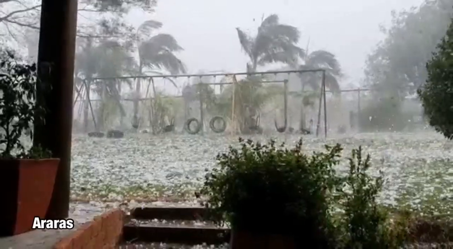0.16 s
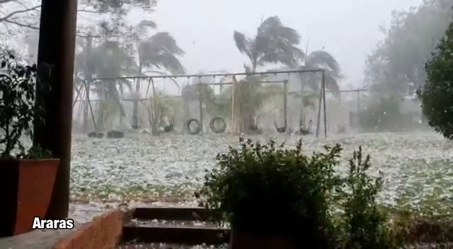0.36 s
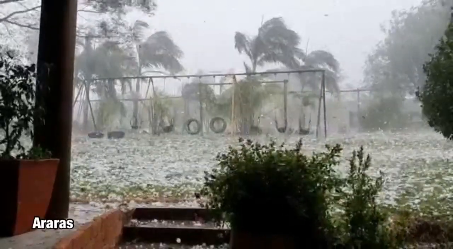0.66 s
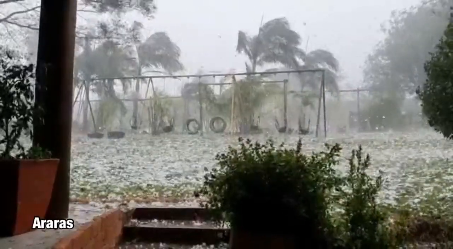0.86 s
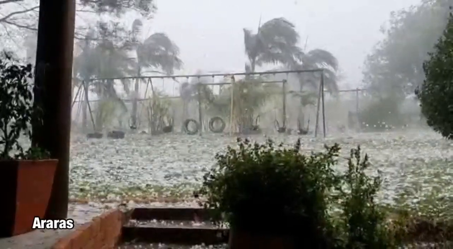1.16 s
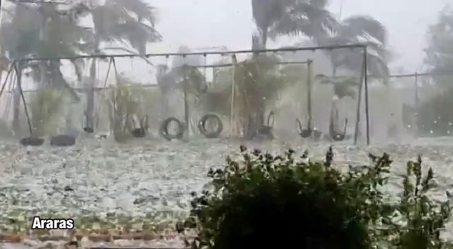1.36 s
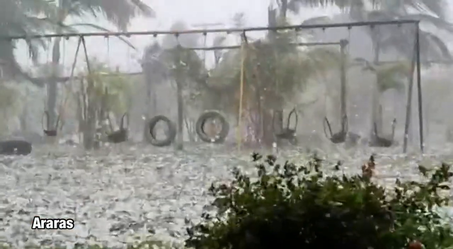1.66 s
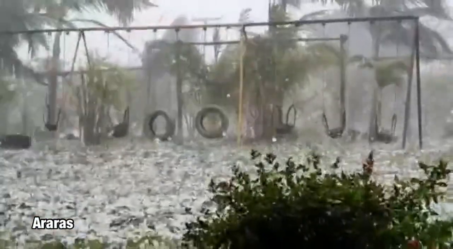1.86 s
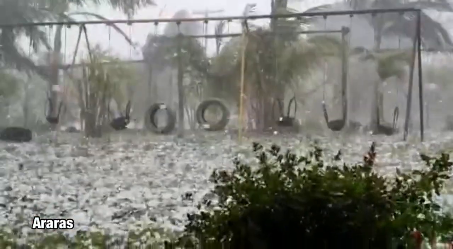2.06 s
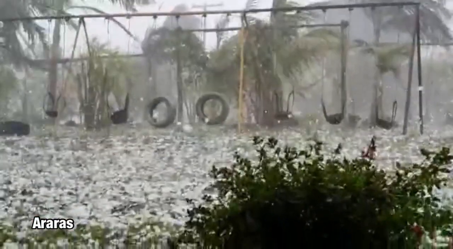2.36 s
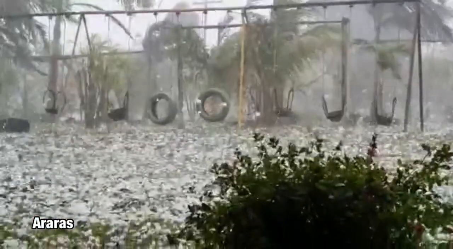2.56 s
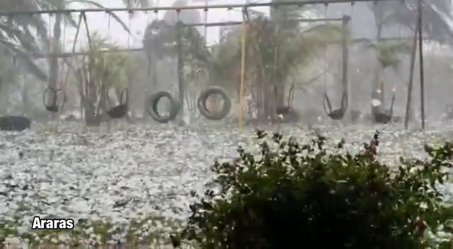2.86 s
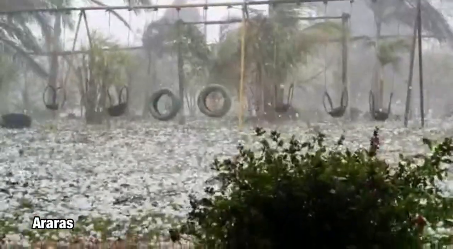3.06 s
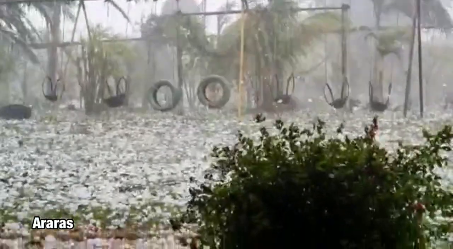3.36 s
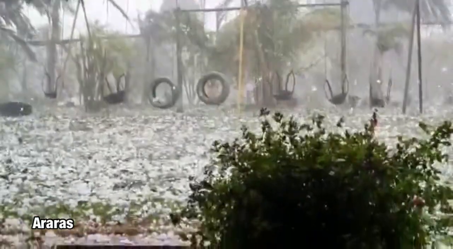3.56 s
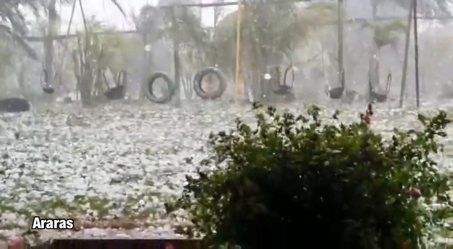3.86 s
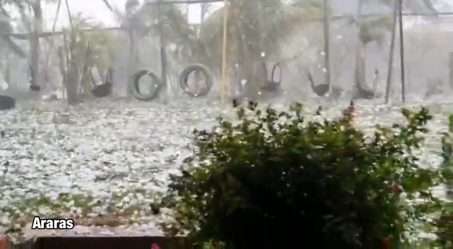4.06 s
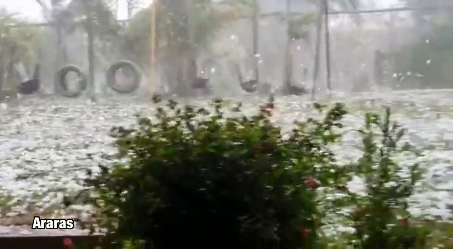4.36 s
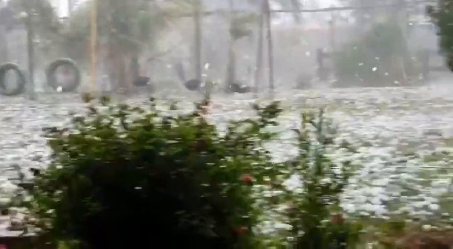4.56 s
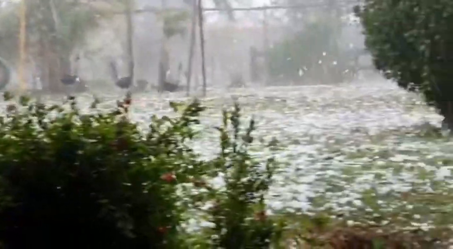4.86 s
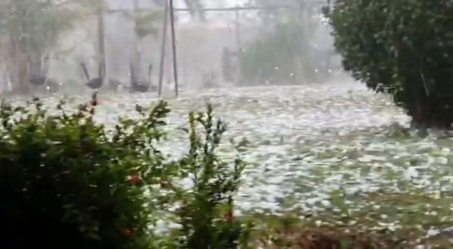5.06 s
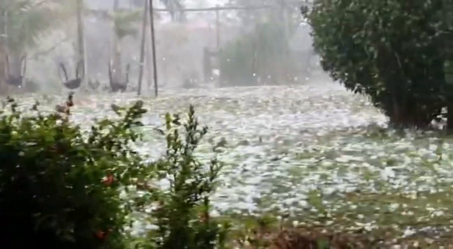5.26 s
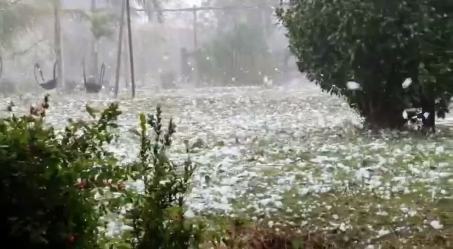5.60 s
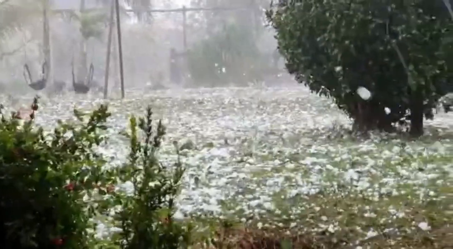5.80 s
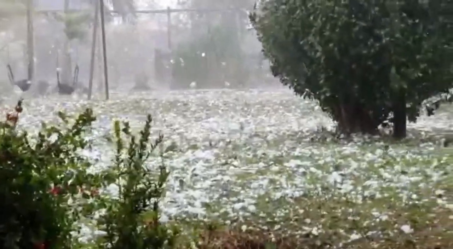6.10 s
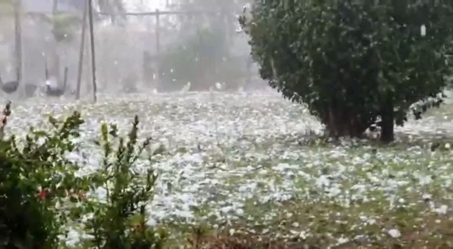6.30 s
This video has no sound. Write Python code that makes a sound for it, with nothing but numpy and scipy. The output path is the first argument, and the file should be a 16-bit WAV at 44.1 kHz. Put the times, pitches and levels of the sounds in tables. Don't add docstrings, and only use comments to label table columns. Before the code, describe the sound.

From a covered porch, a constant dense hailstorm roar with low roof thuds, hard paving knocks, icy ticks and gusty bass booms throughout.

```python
import sys
import numpy as np
from scipy import signal
from scipy.fft import rfft, irfft, dct
from scipy.io import wavfile
from scipy.ndimage import uniform_filter1d

SR = 44100
rng = np.random.default_rng(int(sys.argv[2]) if len(sys.argv) > 2 else 0)


def dump_mix(stems):
    frames = np.atleast_2d(stems).T
    limited = np.clip(frames, -1, 1)
    pcm = np.round(limited * 32767).astype(np.int16)
    wavfile.write(sys.argv[1], SR, pcm)


def undo_db(level):
    steps = np.asarray(level, float) / 20
    return 10 ** steps


N = 283843

# (time [s], fall density [dB], wind drive onto roof [dB])
STORM = [(0.0, -15.5, -23), (0.38, -18, -21), (0.68, -16, -16.5), (1.15, -16.5, -22.5),
         (1.52, -15.5, -18.5), (1.7, -15, -21), (2.26, -15.5, -20), (2.83, -14.5, -18.5),
         (3.05, -15.5, -20), (3.26, -16.5, -22), (3.98, -15, -18.5), (4.21, -15.5, -20), (4.86, -14.5, -18),
         (5.13, -15, -20.5), (5.47, -14, -17), (5.68, -16.5, -20.5), (6.2, -15.5, -21),
         (6.44, -15.5, -17.5)]
# (middle [s], length [s], change [dB])
FLURRIES = [(0.174, 0.039, 1.5), (0.749, .14, 0), (1.135, .08, -1), (1.469, .14, 2), (1.836, 0.087, -2),
            (2.0, 0.08, 0), (2.18, .08, -1.5), (2.944, 0.13, 0), (3.636, .07, -2.5), (3.97, 0.077, -1),
            (4.117, 0.056, -1), (4.227, .08, -1.5), (4.597, .05, -3), (4.858, 0.051, -0.5),
            (5.213, .07, -3), (5.676, .05, -1), (5.793, 0.076, 4), (5.844, 0.035, -2), (6.11, .12, 0.5),
            (6.274, .1, 3.5)]
# (start [s], length [s], level [dB])
BOOM_GUSTS = [(0.453, 0.29, -26.5), (0.797, 0.056, -23.5), (1.264, 0.043, -18.5), (1.401, 0.086, -26.5),
              (1.532, 0.096, -24.5), (1.877, 0.086, -29), (2.17, 0.044, -20), (2.271, 0.116, -27),
              (2.436, 0.158, -24), (2.641, 0.3, -25), (3.06, 0.078, -24.5), (3.327, 0.22, -27.5),
              (3.752, 0.16, -26), (3.973, 0.114, -28.5), (4.197, 0.17, -22.5), (4.525, 0.18, -23),
              (4.929, 0.06, -27), (5.102, 0.35, -24.5), (5.503, 0.095, -19), (5.66, 0.34, -23),
              (6.051, 0.074, -28.5), (6.237, 0.112, -24)]
# (frequency [Hz], density [dB per Hz])
ROAR_COLOUR = [(15, -30.5), (25, -26.5), (71, -5), (96, -2.5), (404, -5), (545, -1), (896, -4), (1940, -5),
               (3030, -10.5), (4080, -14), (4860, -17), (6540, -24.5), (7410, -27.5), (8390, -21.5),
               (9500, -34), (12400, -84), (20900, -120)]
# (centre [Hz], width [Hz], gain [dB])
ROOF_MODE = (96, 11, 5)
# (centre [Hz], width [Hz], gain [dB])
PORT_NOTCH = (7400, 700, -4)
# (time [s], rms of first 7 ms [dB], pitch [Hz])
TICKS = [(0.096, -23, 4760), (0.906, -21, 4470), (1.354, -30.5, 7720), (1.535, -29, 5080),
         (1.909, -33.5, 5240), (1.997, -28, 7700), (2.203, -28.5, 5060), (2.31, -29, 4650),
         (2.376, -27.5, 6190), (2.418, -24.5, 4900), (2.579, -28, 5600), (2.743, -28, 5360),
         (2.859, -25, 4440), (2.919, -30.5, 4490), (3.017, -24.5, 5260), (3.43, -29.5, 4510),
         (3.53, -31, 4900), (3.673, -37.5, 4560), (3.951, -24, 4260), (4.16, -34, 4660),
         (4.382, -25.5, 6080), (4.82, -22.5, 4940), (4.915, -27, 5800), (5.481, -24.5, 4440),
         (5.744, -32, 5530), (5.759, -30.5, 4480), (5.788, -26, 6280), (6.141, -26, 6060),
         (6.371, -32.5, 7960)]
# (peak time [s], peak level [dB], pitch [Hz])
THUDS = [(0.73, -3.5, 347), (0.833, -5, 262), (1.039, -5.5, 560), (1.424, -10, 134.4), (1.941, -8.5, 131),
         (1.984, -5, 179), (2.279, -4.5, 131), (2.34, -9.5, 299), (2.539, -8, 488), (2.723, -4.5, 344),
         (2.762, -8, 319), (3.128, -8, 349), (3.455, -5, 263), (3.465, -6.5, 295), (3.819, -4.5, 470),
         (4.08, -3.5, 543), (4.126, -6.5, 351), (4.384, -7, 567), (4.625, -6.5, 256), (4.738, -0.5, 390),
         (4.774, -6, 407), (4.934, -3, 273), (5.128, -3.5, 264), (5.154, -9.5, 120), (5.736, -5.5, 268),
         (5.88, -3.5, 275), (5.933, -5.5, 388), (6.171, -11.5, 241), (6.3, -5.5, 505),
         (0.77, -10, 480), (1.279, -16, 109.6), (1.347, -9, 136.1), (1.46, -7, 550), (1.52, -8, 523),
             (2.168, -11, 225), (2.95, -7.5, 533), (3.03, -4.5, 473), (3.234, -13, 275),
             (3.279, -12.5, 262), (4.1, -7.5, 453), (4.63, -8.5, 150), (4.973, -9, 129.5),
             (5.401, -9.5, 138), (5.55, -7, 127)]
# (time [s], rms of first 12 ms [dB], pitch [Hz])
KNOCKS = [(0.094, -16.5, 2550), (0.155, -11, 1454), (0.906, -14.8, 1435), (1.017, -14, 1010),
          (1.426, -14, 1570), (1.465, -21.5, 1154), (1.494, -17, 1540), (1.546, -19, 1510),
          (1.913, -22.5, 1860), (1.986, -11, 865), (2.028, -17, 2220), (2.317, -11.5, 2370),
          (2.419, -14, 1820), (2.578, -12, 1445), (2.65, -12.5, 1230), (2.786, -15.5, 1245),
          (2.922, -16.5, 3270), (3.019, -14.5, 2140), (3.54, -11.5, 1305), (3.672, -9.5, 1256),
          (3.682, -16, 2390), (3.961, -14, 1900), (4.381, -12, 3220), (4.673, -13, 2220),
          (4.825, -10.5, 1810), (4.916, -17.5, 3250), (5.69, -11.5, 1000), (5.752, -17, 2460),
          (5.874, -14.5, 1500), (6.38, -12, 1070)]
# (frequency [Hz], step [dB])
ROUNDING_STEP = [(100, -6.5), (500, -4.5), (900, -.5), (3000, 2.5), (4200, 4.5), (7300, 8.5), (8300, 5),
                 (9200, 11)]

ROOF_TOP_HZ, GROUND_TOP_HZ, LEAF_TOP_HZ = 500, 4000, 11500
GROUND_DB, ROOF_DB = -0.19, -0.43
BOOM_DB, BOOM_SHARE = -9, 0.3
LEAF_DB, LEAF_SHARE = -17, 0.48
ROOF_FLURRY_SHARE = 0.8


def rms_one(x):
    return x / np.sqrt(np.mean(x ** 2) + 1e-20)


def drift(rate_hz):
    hop = 40
    r = np.exp(-2 * np.pi * hop * rate_hz / SR)
    noise = rng.standard_normal(N // hop + 2002)
    slow = signal.lfilter([1], [1, -2 * r, r * r], noise)[2000:]
    return np.interp(np.arange(N) / hop, np.arange(len(slow)), rms_one(slow))


def resonance(x, hz, width_hz):
    r = np.exp(-np.pi * width_hz / SR)
    poles = [1, -2 * r * np.cos(2 * np.pi * hz / SR), r * r]
    return signal.lfilter([(1 - r * r) / 2, 0, (r * r - 1) / 2], poles, x)


def flurries_db():
    t = np.arange(N) / SR
    return sum(change_db * np.exp(-0.5 * ((t - middle_s) / (length_s / 2)) ** 2)
               for middle_s, length_s, change_db in FLURRIES)


def follow(level_db, offset_db, share):
    mean_db = level_db.mean()
    return undo_db(mean_db + offset_db + share * (level_db - mean_db))


def impacts(per_s, spread_db, blur_s):
    born = rng.random(N) < per_s / SR
    energy = born * undo_db(2 * spread_db * np.minimum(rng.exponential(1, N), 5))
    r = np.exp(-2 / (blur_s * SR))
    power = signal.lfilter([1 - r], [1, -r], energy + 1e-12)
    return rms_one(np.sqrt(power) * rng.standard_normal(N))


def hail_layer(low_hz, high_hz, per_s, spread_db, blur_s, far_db, patchy_db):
    hz = np.maximum(np.fft.rfftfreq(N, 1 / SR), 1)
    colour_hz, colour_db = np.transpose(ROAR_COLOUR)
    colour = undo_db(np.interp(np.log(hz), np.log(colour_hz), colour_db))
    for mode_hz, width_hz, mode_db in (ROOF_MODE, PORT_NOTCH):
        colour = colour * undo_db(mode_db / (1 + (2 * (hz - mode_hz) / width_hz) ** 2))
    stones = impacts(per_s, spread_db, blur_s) + undo_db(far_db) * rng.standard_normal(N)
    spectrum = colour * rfft(stones)
    out, gust = 0, drift(3.1)
    for centre_hz in low_hz * 2 ** np.arange(0.25, np.log2(high_hz / low_hz), 0.5):
        share = np.cos(np.pi * np.clip(np.log2(hz / centre_hz), -0.5, 0.5)) ** 2
        out = out + irfft(share * spectrum, N) * undo_db(patchy_db * (1.1 * gust + drift(4.5)))
    return rms_one(out)


def leaves(fall_db):
    patter = hail_layer(GROUND_TOP_HZ, LEAF_TOP_HZ, per_s=500, spread_db=2.5, blur_s=0.006,
                        far_db=2.5, patchy_db=0.5)
    return follow(fall_db, LEAF_DB, LEAF_SHARE) * patter


def ground(fall_db):
    clatter = hail_layer(ROOF_TOP_HZ, GROUND_TOP_HZ, per_s=700, spread_db=2.5, blur_s=0.003,
                         far_db=3, patchy_db=0.52)
    return undo_db(fall_db + GROUND_DB) * clatter


def gusts():
    t = np.arange(N) / SR
    held = sum(undo_db(level_db) * (t > start_s) * (t < start_s + length_s)
               for start_s, length_s, level_db in BOOM_GUSTS)
    return uniform_filter1d(held, size=round(0.04 * SR))


def porch_boom(drive_db):
    boom = hail_layer(ROOF_TOP_HZ / 32, ROOF_TOP_HZ / 4, per_s=300, spread_db=1, blur_s=0.05,
                      far_db=8, patchy_db=0.2)
    return np.maximum(follow(drive_db, BOOM_DB, BOOM_SHARE), gusts()) * boom


def roof(drive_db, flurry_db):
    drumming = hail_layer(ROOF_TOP_HZ / 4, ROOF_TOP_HZ, per_s=300, spread_db=2, blur_s=0.025,
                          far_db=5, patchy_db=0.3)
    return undo_db(drive_db + ROOF_DB + ROOF_FLURRY_SHARE * flurry_db) * drumming


def burst(dying_s, click_db):
    t = np.arange(SR // 5) / SR
    decay = undo_db(-60 * t / np.clip(dying_s, 0.004, 0.4))
    x = rng.standard_normal(len(t)) * decay * np.minimum(t / 0.0025, 1)
    x[0] = undo_db(click_db)
    return x


def add(track, at_s, level_db, sound):
    i = max(round(at_s * SR), 0)
    track[i:i + len(sound)] += (undo_db(level_db) * sound)[:N - i]


def ticks():
    out = np.zeros(N)
    for at_s, level_db, hz in TICKS:
        x = burst(dying_s=0.05, click_db=12)
        spray = resonance(resonance(x, 4900, 2000), 4900, 2400)
        spray = spray + 0.3 * resonance(resonance(x, 8400, 1000), 8400, 1000)
        crack = resonance(resonance(x, hz, 700), hz, 1000) * 4600 / hz + 0.4 * spray
        add(out, at_s, level_db, crack / crack[:SR * 7 // 1000].std())
    return out


def thuds():
    out = np.zeros(N)
    for peak_s, peak_db, hz in THUDS:
        x = -burst(dying_s=0.15, click_db=27)
        thud = resonance(resonance(x, hz, 0.5 * hz), hz, 1.5 * hz)
        size = np.abs(thud)
        add(out, peak_s - np.argmax(size) / SR, peak_db - 1, thud / size.max())
    return out


def knocks():
    out = np.zeros(N)
    soft = signal.butter(4, [600, 3700], "band", fs=SR, output="sos")
    for at_s, level_db, hz in KNOCKS:
        x = burst(dying_s=0.11, click_db=19.5)
        ring = resonance(x, hz, 0.4 * hz) + 0.8 * resonance(x, 1200, 1300)
        ring = signal.sosfilt(soft, ring)
        add(out, at_s + 0.0005, level_db + 0.7, ring / ring[:SR * 12 // 1000].std())
    return out


def scene():
    time_s, fall_db, drive_db = np.transpose(STORM)
    t = np.arange(N) / SR
    flurry_db = flurries_db()
    fall_db = np.interp(t, time_s, fall_db) + flurry_db
    drive_db = np.interp(t, time_s, drive_db)
    outside = leaves(fall_db) + ground(fall_db)
    overhead = porch_boom(drive_db) + roof(drive_db, flurry_db)
    return (outside + overhead + ticks() + thuds() + knocks())[None]


def starved_bands(x, wander_db, leak_db):
    size, shift = 1024, 339
    count = N // size + 3
    window = np.sin(np.pi * (np.arange(2 * size) + 0.5) / (2 * size))
    padded = np.pad(x, (2 * size - shift, 3 * size), "reflect")
    index = size * np.arange(count)[:, None] + np.arange(2 * size)
    a, b, c, d = np.split(padded[index] * window, 4, axis=1)
    lines = dct(np.hstack([-c[:, ::-1] - d, a - b[:, ::-1]]), type=4, norm="ortho")
    hz = (np.arange(size) + 0.5) * SR / (2 * size)
    usual = np.sqrt(uniform_filter1d(np.mean(lines ** 2, axis=0), size=10))

    wander = uniform_filter1d(rng.standard_normal((count, size // 16)), size=3, axis=0)
    wander = np.repeat(wander, 16, axis=1) * np.minimum(hz / 7000, 1)
    loud = np.sqrt(np.mean((lines / usual)[:, :400] ** 2, axis=1, keepdims=True))
    step_db = np.interp(hz, *np.transpose(ROUNDING_STEP)) + wander_db * wander
    step = loud ** 0.69 * usual * undo_db(step_db)
    rounded = np.floor((np.abs(lines) / step) ** 0.75 + 0.4054) ** (4 / 3)
    rounded = step * np.sign(lines) * rounded
    top_hz = 9170 + 200 * np.maximum(uniform_filter1d(rng.standard_normal(count), size=2), -0.4)
    rounded = rounded * (hz < top_hz[:, None])

    spill = uniform_filter1d(uniform_filter1d(np.abs(rounded), size=50), size=5, axis=0)
    rounded = rounded + undo_db(leak_db) * spill * rng.standard_normal(rounded.shape)

    u, v = np.split(dct(rounded, type=4, norm="ortho"), 2, axis=1)
    frames = np.hstack([v, -v[:, ::-1], -u[:, ::-1], -u]) * window
    joined = (frames[1:, :size] + frames[:-1, size:]).ravel()
    return joined[size - shift:][:N]


def low_pass(x):
    return signal.sosfilt(signal.butter(12, 9780, fs=SR, output="sos"), x)


def record(dry):
    x = 1.08 * np.tanh(dry[0] / 1.08)
    mix = starved_bands(x, wander_db=4.5, leak_db=-27)[None]
    return low_pass(mix)


dry = scene()
out = record(dry)
dump_mix(out)
```